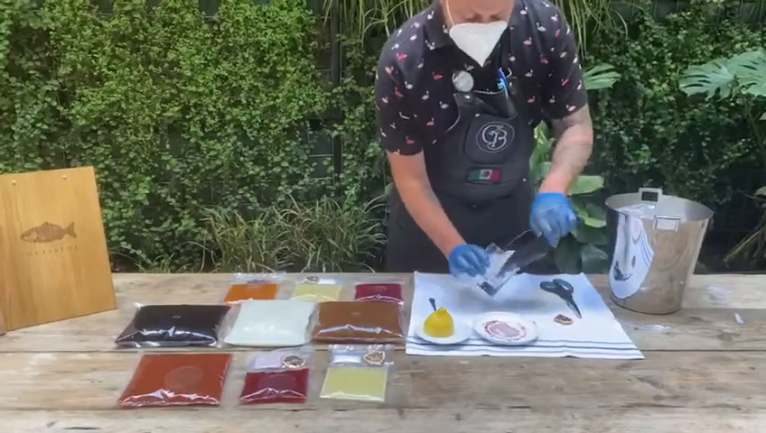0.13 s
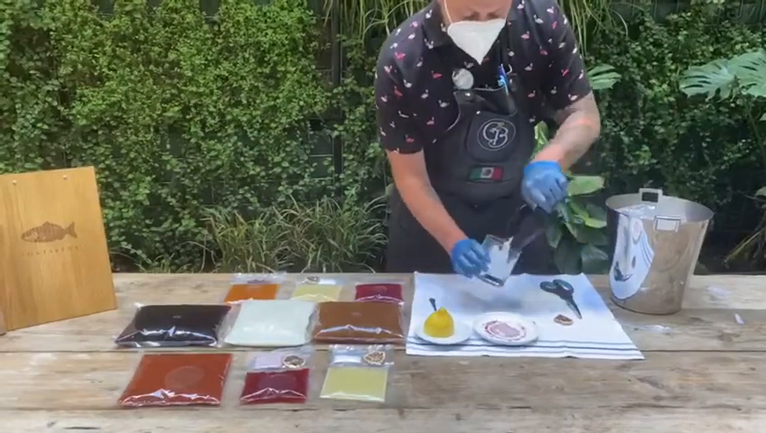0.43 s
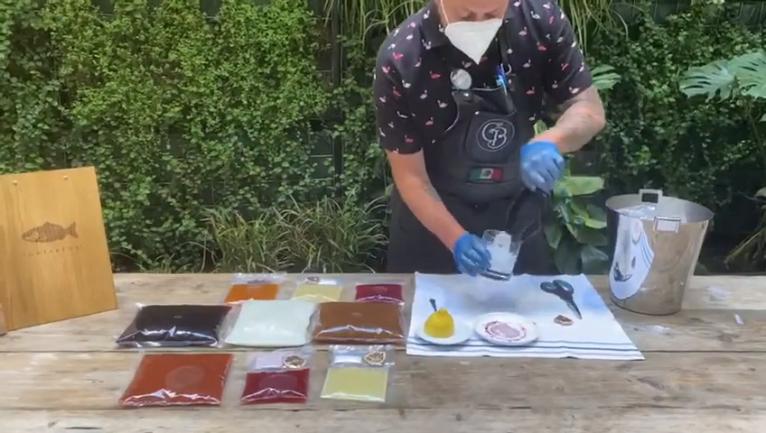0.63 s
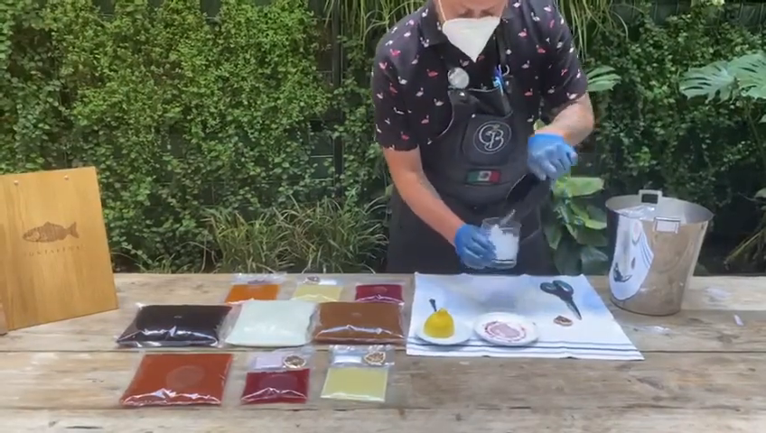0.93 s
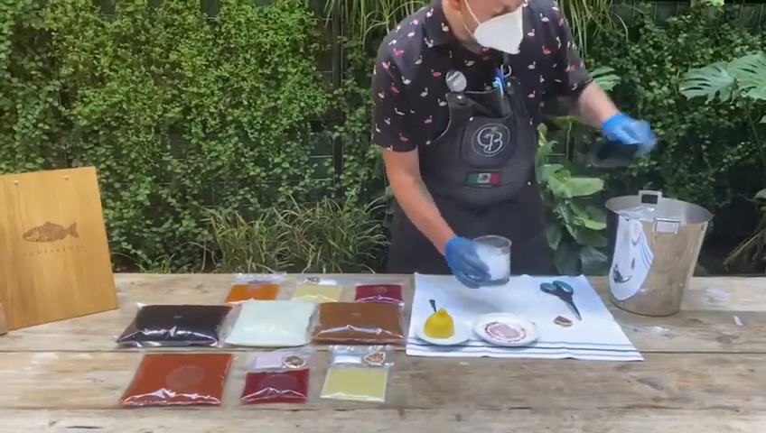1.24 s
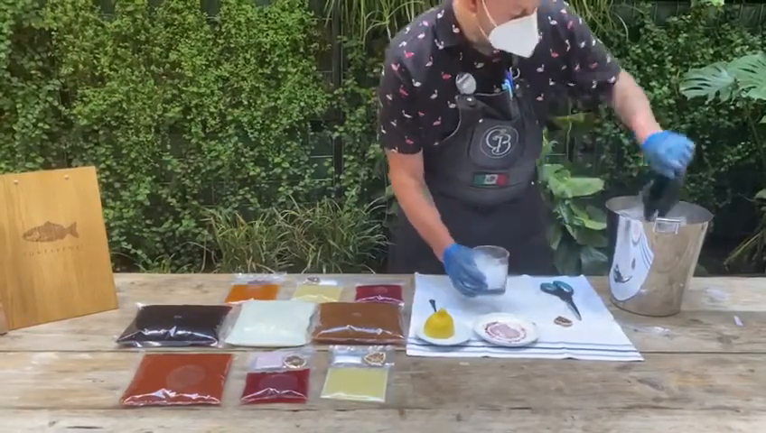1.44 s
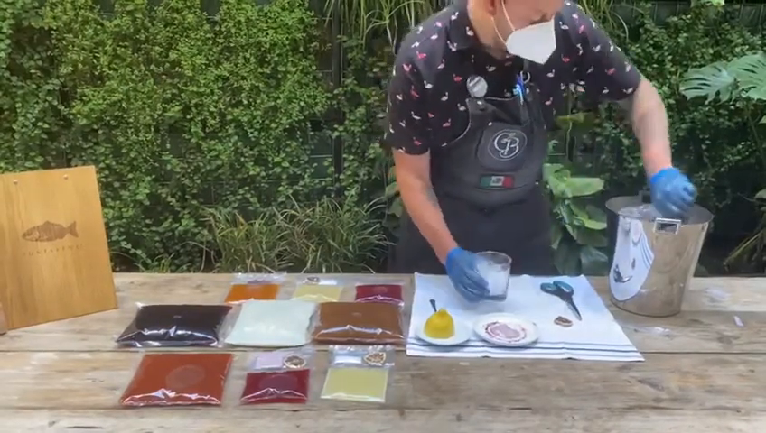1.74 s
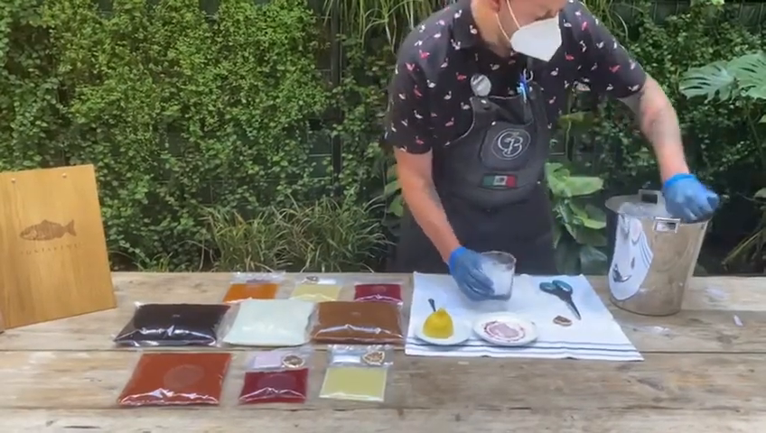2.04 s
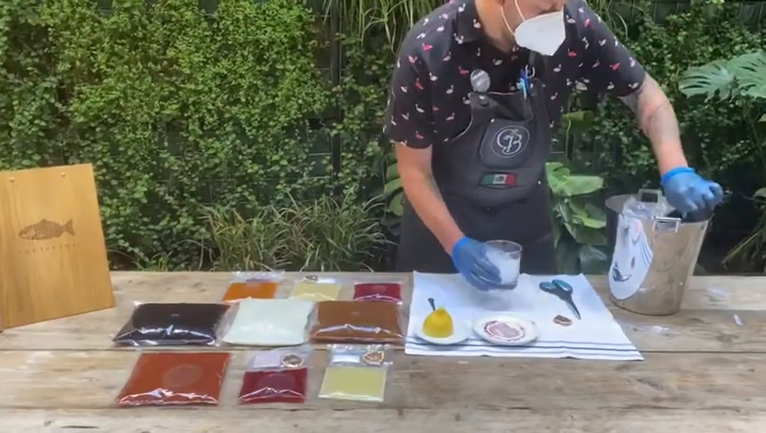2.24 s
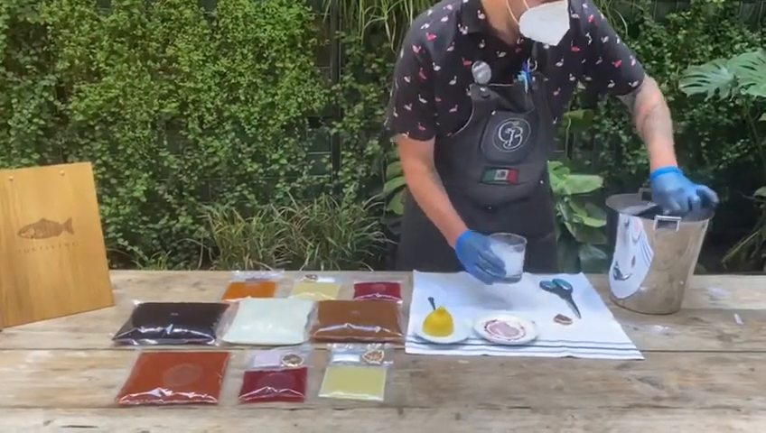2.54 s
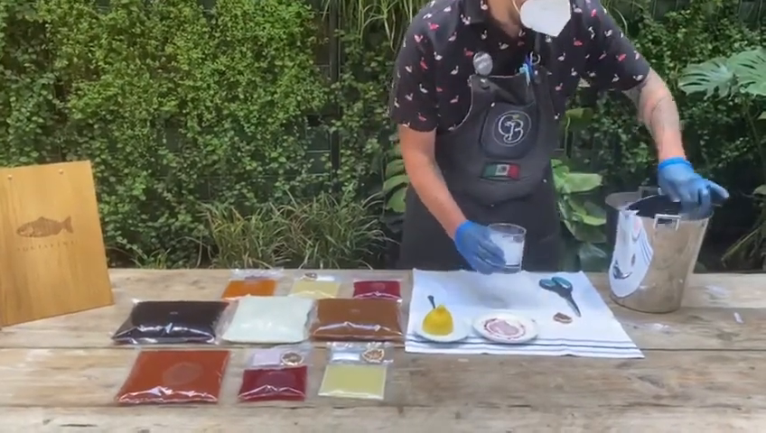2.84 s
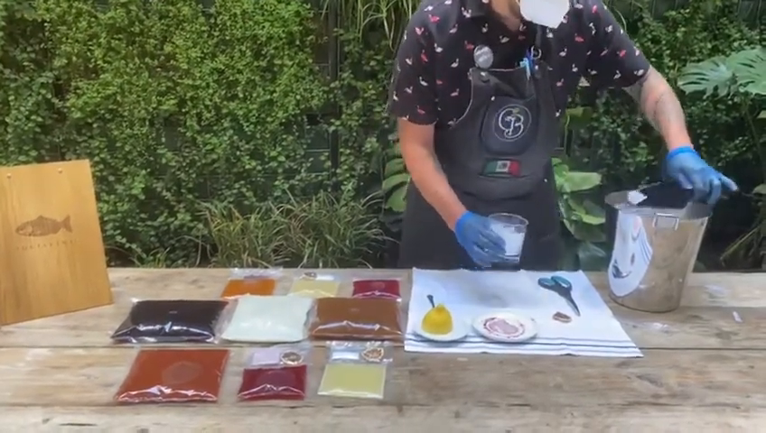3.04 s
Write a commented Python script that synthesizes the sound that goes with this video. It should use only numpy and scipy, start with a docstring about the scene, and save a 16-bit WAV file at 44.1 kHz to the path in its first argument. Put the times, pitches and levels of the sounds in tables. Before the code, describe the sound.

Ice cubes slide from a scoop and knock and clink dully into a hand-held glass; after a brief quiet, the scoop digs into a metal bucket of ice, crunching and clanking. Outdoors, close stereo microphones, faint low rumble.

```python
"""Ice cubes strike a hand-held glass, each a dull knock, a tick and decaying glass modes.
Ice sliding off a scoop rattles around them: dense random impacts exciting short modes and grit.
The scoop then digs into a metal ice bucket: the heap crunches as impacts drive body and wall modes,
and timed blows, one of them hard, ring the wall. Behind lie filtered-noise air and a wavering low rumble.
A close pair of microphones is formed from a common and a differing part."""
import sys
import numpy as np
from scipy import signal
from scipy.fft import rfft, irfft
from scipy.io import wavfile

SR = 44100
rng = np.random.default_rng(int(sys.argv[2]) if len(sys.argv) > 2 else 0)


def generate_wav(sig):
    """Save sig (samples, or channels by samples) to the path in sys.argv[1] as 16-bit PCM at SR."""
    pcm = np.round(np.clip(np.atleast_2d(sig).T, -1, 1) * 32767).astype(np.int16)
    wavfile.write(sys.argv[1], SR, pcm)


N = 141120  # samples

SPOT_DB = 4  # range over which a mode's strength varies with the spot struck
GRAIN_DB = 3.5  # scale of the spread of impact sizes

# Cubes striking the glass, levels before the trims below:
# start_s, knock_level_db, knock_pitch_hz, glass_level_db, tick_level_db
CLINKS = [(0.0488, -52.5, 2170, -59.5, -57), (0.1092, -44, 2340, -54.5, -43.5),
          (0.1959, -57, 2760, -47, -61), (0.226, -42, 2500, -57, -47), (0.244, -40, 2700, -58, -47),
          (0.2686, -37, 2690, -44, -45), (0.2837, -24.5, 2580, -39, -52), (0.329, -40, 1480, -55.5, -61),
          (0.3531, -44, 1506, -55, -66), (0.3684, -47, 2620, -55, -46), (0.379, -34, 2620, -65, -56),
          (0.5841, -36.5, 2560, -69, -38), (0.7196, -44, 1580, -73, -51), (0.7578, -39.5, 1720, -70, -62),
          (0.7797, -50, 2450, -68, -48), (0.809, -44, 1660, -67, -65), (0.856, -54, 2400, -70, -54),
          (0.8948, -26, 2435, -36.5, -50), (0.9224, -31, 2617, -52, -69.5), (0.9436, -39.5, 2620, -58, -73),
          (0.987, -43.5, 2500, -60, -66), (1.187, -51.5, 2510, -56.5, -61)]
# Free modes of the glass: pitch_hz, relative_level_db, t60_s
GLASS_MODES = [(1456, -2.5, 0.13), (2500, -1, 0.2), (2620, -0.5, 0.24), (2760, -2, 0.13), (3290, -8, 0.3),
               (4720, 5.5, 0.13), (6790, -1, 0.13)]
# Bright crack of a cube on bare glass: frequency_hz, level_db
SNAP_SPECTRUM = [(1000, -7), (4000, -10), (7500, -12), (9700, 6.5), (12000, -23)]
# Icy grit, also heard in the slide: frequency_hz, level_db
ICE_GRIT_SPECTRUM = [(500, -11.5), (1000, -1.5), (3500, -7), (7000, -9.5), (12000, -21)]
CLUSTER_SPREAD = 0.0081  # side modes lie up to this share of the pitch away
POUR_ENDS_S, POUR_DAMPING = 0.88, 0.75  # until then pouring ice damps the glass; factor on its decay times
FLUTTER = 0.66  # depth of the throb: loose ice against the glass


def clinks():
    """Modal excitation: each cube gives a dull pitched knock and a tick, and sets the glass ringing."""
    out = np.zeros((2, N))
    for start_s, knock_db, pitch_hz, glass_db, tick_db in CLINKS:
        damping = POUR_DAMPING if start_s < POUR_ENDS_S else 1
        # each glass mode is a close cluster of three
        cluster = []
        for hz, db, t60 in GLASS_MODES:
            for k in (-1, 0, 1):
                side_hz = hz * (1 + CLUSTER_SPREAD * k * rng.random())
                cluster.append((side_hz, db - 4 * abs(k), damping * t60 / (1 + 1.1 * abs(k))))
        tap = gain_of(knock_db) * knock(pitch_hz, t60=0.017, tail_db=-21)
        glass = gain_of(glass_db + 7.5) * peaked(ring(cluster, SPOT_DB, flutter=FLUTTER))
        short_snap = gain_of(glass_db + 2) * peaked(crack(SNAP_SPECTRUM, t60=0.021))
        long_snap = gain_of(glass_db - 1) * peaked(crack(SNAP_SPECTRUM, t60=0.13))
        tick = gain_of(tick_db + 5) * peaked(crack(ICE_GRIT_SPECTRUM, t60=0.032))
        add(out, start_s, tap + glass)
        add(out, start_s, short_snap + long_snap)
        add(out, start_s, tick)
    return out


def knock(hz, t60, tail_db):
    """Heavily damped modes: a tap that swells over two cycles, with an undertone and a weaker, longer tail."""
    tail_t60 = 0.11  # s
    modes = [(hz, 0, t60), (hz * 1.037, -5, t60),
             (hz * 0.442, -16, t60),  # low undertone
             (hz * 1.03, tail_db, tail_t60), (hz * 0.89, tail_db, tail_t60)]
    return peaked(ring(modes, SPOT_DB, rise_s=2 / hz))


# Ice sliding from the scoop, levels before trims: start_s, rattle_level_db, treble_level_db
SLIDE = [(0.0, -64.5, -64), (0.274, -43.5, -44), (0.346, -49.5, -56), (0.39, -50, -53), (0.434, -63, -64),
         (0.576, -56, -59), (0.584, -42, -51), (0.648, -61.5, -61), (0.772, -56.5, -60),
         (0.884, -60.5, -72), (0.894, -57, -49.5), (1.028, -67.5, -76), (1.1, -74, -86)]
# Damped resonances of glass and scoop: pitch_hz, width_hz, relative_level_db
SLIDE_BODY = [(1455, 190, 1.5), (1660, 200, -6), (2176, 170, -2.5), (2296, 280, -2), (2660, 59, -4),
              (3330, 110, -13.5)]


def slide():
    """Random impact excitation: dense contacts in the damped glass and scoop, with grit and loose chips."""
    body = []
    for _ in range(12):
        # each spot is tuned a little apart; a wider resonance decays sooner
        modes = [(hz * (1 + 0.0586 * rng.uniform(-0.965, 1)), db, 5.8 / width)
                 for hz, width, db in SLIDE_BODY]
        body.append(ring(modes, uneven_db=11))
    grit = [crack(ICE_GRIT_SPECTRUM, t60=0.055) for _ in range(6)]
    rattle_drive = contacts(500, 4.6) * level(SLIDE, 1) * gain_of(-2.5)
    grit_drive = contacts(700, GRAIN_DB) * level(SLIDE, 2)
    chip_drive = contacts(140, GRAIN_DB) * level(SLIDE, 2) * gain_of(-8.5)
    return played(rattle_drive, body) + played(grit_drive, grit) + played(chip_drive, chips())


CHIP_HZ, CHIP_T60_S, CHIP_RISE_S = (2760, 7180), 0.038, 0.00064  # pitch range, decay, onset


def chips():
    """Small resonators: pieces of loose ice ring briefly, each at its own pair of pitches."""
    pairs = rng.uniform(*CHIP_HZ, (16, 2))
    return [ring([(hz, 0, CHIP_T60_S) for hz in pair], SPOT_DB, CHIP_RISE_S) for pair in pairs]


# Scoop working in the bucket, levels before trims: start_s, body_level_db, wall_level_db, treble_level_db
DIG = [(1.52, -79, -85, -100), (1.55, -58, -63, -65), (1.614, -59.5, -71, -80), (1.646, -78, -69, -76),
       (1.67, -51.5, -48.5, -64.5), (1.71, -50.5, -45, -55.5), (1.838, -49.5, -45, -60),
       (1.862, -56.5, -49, -63), (1.982, -47, -49, -62), (2.034, -54, -51.5, -70.5),
       (2.116, -40.5, -55, -66), (2.198, -50, -47, -64.5), (2.24, -58.5, -62, -74),
       (2.534, -51, -45.5, -58), (2.552, -33, -27.5, -59), (2.604, -36, -32.5, -63),
       (2.7, -42.5, -38.5, -63.5), (2.74, -49, -46.5, -73.5), (2.878, -54.5, -49.5, -66.5),
       (3.146, -63.5, -64.5, -83.5), (3.2, -74, -62, -74)]
# Low modes of the bucket, also struck by the blows: pitch_hz, relative_level_db, t60_s
BODY_MODES = [(172.2, -6, 0.13), (223, -14.5, 0.13), (280.4, 1, 0.12), (302, 2.5, 0.07), (331, -4.5, 0.16),
              (403, -7.5, 0.12), (483.4, -6.5, 0.14), (535, -1.5, 0.061)]
# Modes of the bucket wall, also struck by the blows: pitch_hz, relative_level_db, t60_s
WALL_MODES = [(892, -11.5, 0.65), (1089, -5, 0.21), (1184, -5, 0.24), (1271, -11, 0.38), (1404, 0, 0.34),
              (1499, -0.5, 0.32), (1564, -8, 0.3), (1721, 1, 0.2), (1840, -4.5, 0.81), (2050, -9.5, 0.12),
              (2380, -9, 0.16), (2510, -4.5, 0.28), (2660, -6.5, 0.09), (3480, -7, 0.11)]
# Scrape of the scoop: frequency_hz, level_db
SCRAPE_SPECTRUM = [(650, -6), (1200, 7), (2500, -4.5), (4000, -13), (12000, -35)]
# Crunch of the heap, also the crack of the blows: frequency_hz, level_db
CRUNCH_SPECTRUM = [(600, -3.5), (2500, 2), (5000, -2), (9000, -3.5), (12000, -6)]


def dig():
    """Granular excitation: shifting ice drives low body, free and ice-damped wall modes, scrape and crunch."""
    low_shapes = []
    for _ in range(8):
        modes = [(hz * rng.uniform(0.94, 1.04), db, t60) for hz, db, t60 in BODY_MODES]
        low_shapes.append(ring(modes, uneven_db=7, rise_s=0.00096))
    free_shapes = [ring(WALL_MODES, 2 * SPOT_DB) for _ in range(4)]
    damped_shapes = []
    for _ in range(6):
        # ice on the wall shifts each mode and cuts its decay to a fifth
        modes = [(hz * (1 + 0.064 * rng.uniform(-0.85, 1)), db, t60 * 0.2) for hz, db, t60 in WALL_MODES]
        damped_shapes.append(ring(modes, uneven_db=37))
    scrapes = [crack(SCRAPE_SPECTRUM, t60=0.056) for _ in range(5)]
    crunches = [crack(CRUNCH_SPECTRUM, t60=0.042) for _ in range(6)]

    body_level, wall_level, treble_level = level(DIG, 1), level(DIG, 2), level(DIG, 3)
    low = played(contacts(600, 1.14) * body_level * gain_of(-0.5), low_shapes)
    free_wall = played(contacts(700, 1.7) * wall_level * gain_of(-5), free_shapes)
    damped_wall = played(contacts(250, 6.2) * wall_level * gain_of(-8.5), damped_shapes)
    scrape = played(contacts(900, GRAIN_DB) * wall_level * gain_of(-4.5), scrapes)
    crunch = played(contacts(1200, GRAIN_DB) * treble_level * gain_of(11.5), crunches)
    return low + free_wall + damped_wall + scrape + crunch


# Blows on the bucket, levels before trims:
# start_s, knock_level_db, knock_pitch_hz, wall_level_db, body_level_db, crack_level_db
BLOWS = [(1.529, -45, 2060, -59, -59, -59), (1.6612, -29, 1630, -38.5, -50, -65),
         (1.6951, -33, 1580, -39, -52, -48), (1.907, -28.5, 1350, -42.5, -40.5, -39),
         (2.0948, -28.5, 1100, -64, -30.5, -68), (2.121, -23.5, 174.6, -62, -42, -67),
         (2.173, -28, 2660, -50, -40, -59), (2.4077, -38, 1487, -40, -44.5, -46.5),
         (2.5492, -20, 1064, -19, -19, -38), (2.587, -23, 1420, -28.5, -31, -41),
         (2.628, -22, 1553, -33, -36, -60), (2.8504, -22, 1463, -35, -45, -49),
         (2.9267, -22.5, 1460, -46.5, -46, -60), (3.178, -43, 1170, -59, -71, -54.5)]


def blows():
    """Impulse response: each single hit gives a knock, the wall's ring, a damped low thump and a crack."""
    out = np.zeros((2, N))
    thump_modes = [(hz, db, t60 * 0.28) for hz, db, t60 in BODY_MODES]
    for start_s, knock_db, pitch_hz, wall_db, body_db, crack_db in BLOWS:
        tap = gain_of(knock_db - 11.5) * knock(pitch_hz, t60=0.022, tail_db=-8.5)
        wall = gain_of(wall_db) * peaked(ring(WALL_MODES, uneven_db=5.5, rise_s=0.0019))
        thump = gain_of(body_db) * peaked(ring(thump_modes, SPOT_DB, rise_s=0.0085))
        burst = gain_of(crack_db + 6.5) * peaked(crack(CRUNCH_SPECTRUM, t60=0.085))
        add(out, start_s, tap + wall)
        add(out, start_s, thump)
        add(out, start_s, burst)
    return out


# Spectrum of the air: frequency_hz, level_db
AIR_SPECTRUM = [(100, 6.5), (200, 5), (600, -1.5), (900, -8), (1700, -14.5), (3000, -22), (5000, -37),
                (8000, -34), (12000, -78.5)]
AIR_DB = -60.5  # RMS level before the pair is formed
# Wavering of the rumble: start_s, level_db
RUMBLE = [(0, -50), (.4, -46.5), (1.1, -52.5), (1.6, -48), (3.2, -49.5)]
# Spectrum of the rumble: frequency_hz, level_db
RUMBLE_SPECTRUM = [(20, -46), (40, -18), (52, -4), (66, 6), (85, -5), (110, -6.5), (150, -17), (220, -61)]


def outdoors():
    """Filtered noise: steady air and a low, wavering rumble."""
    air = gain_of(AIR_DB) * evened(coloured(rng.standard_normal((2, N)), AIR_SPECTRUM))
    rumble = evened(coloured(rng.standard_normal((2, N)), RUMBLE_SPECTRUM)) * level(RUMBLE, 1)
    return air + rumble


FLUTTER_HZ = 100  # centre rate; each mode throbs at 0.5 to 1.5 times this


def ring(modes, uneven_db, rise_s=0.0014, flutter=0):
    """Modal synthesis: one blow as decaying sines, a common and a differing part; common energy 1."""
    t = np.arange(SR // 3) / SR
    hz, db, t60 = np.transpose(modes)[:, :, None]
    draw = rng.random((len(modes), 4))  # two phases, strength, throb rate
    strength_db = db + uneven_db * (draw[:, 2:3] - 0.5)
    size = gain_of(strength_db - 60 * t / t60) * np.minimum(t / rise_s, 1)
    size = size * (1 - t / t[-1]) ** 0.58  # fades to silence at the end
    throb_hz = FLUTTER_HZ * (0.5 + draw[:, 3:])
    size = size * (1 - flutter * np.sin(np.pi * throb_hz * t) ** 2)
    out = np.array([(size * np.sin(2 * np.pi * (hz * t + draw[:, k:k + 1]))).sum(0) for k in (0, 1)])
    return out / np.linalg.norm(out[0])


def crack(points, t60):
    """Noise burst: coloured noise under exponential decay, two independent parts; common energy 1."""
    t = np.arange(4096) / SR
    out = coloured(rng.standard_normal((2, 4096)), points) * gain_of(-60 * t / t60)
    return out / np.linalg.norm(out[0])


def contacts(per_s, spread_db):
    """Poisson-like impact train: random signs, many small impacts and a few large; RMS 1."""
    size_db = spread_db * np.minimum(rng.exponential(1, N), 4)
    size = gain_of(size_db) * rng.choice([-1., 1.], N)
    return evened(size * (rng.random(N) < per_s / SR))


def played(drive, shapes):
    """Convolution: each impact lands on another spot, so takes one of several responses."""
    spot = rng.integers(0, len(shapes), N)
    return sum(signal.oaconvolve((drive * (spot == k))[None], shape, axes=1)[:, :N]
               for k, shape in enumerate(shapes))


def coloured(x, points):
    """Spectral shaping: filters the last axis by a spectrum given in dB."""
    f, db = np.transpose(points)
    hz = np.fft.rfftfreq(x.shape[-1], 1 / SR)
    gain = gain_of(np.interp(np.log(hz + 1), np.log(f), db))
    return irfft(rfft(x) * gain, x.shape[-1])


def level(curve, column):
    """Amplitude envelope: gain over time from one dB column, practically silent outside the curve."""
    rows = np.array(curve)
    return gain_of(np.interp(np.arange(N) / SR, rows[:, 0], rows[:, column], left=-140, right=-140))


def gain_of(db):
    """Decibel law: amplitude ratio from a level in dB."""
    return 10 ** (np.asarray(db) / 20)


def evened(x):
    """RMS normalisation: scales to an RMS of 1 over all samples together."""
    return x / np.sqrt(np.mean(x ** 2) + 1e-20)


def peaked(x):
    """Peak normalisation: scales both parts so that the common one peaks at 1."""
    return x / abs(x[0]).max()


def add(mix, start_s, sound):
    """Superposition: adds a sound into the mix in place, cut at the end."""
    part = mix[:, round(start_s * SR):][:, :sound.shape[1]]
    part += sound[:, :part.shape[1]]


def scene():
    """Sum and difference: all sources add, then form the left and right signals."""
    common, apart = clinks() + slide() + dig() + blows() + outdoors()
    return np.array([common + apart, common - apart])


# Filter on the common part: narrow dips, a hole near 8 kHz, steep top cut: frequency_hz, level_db
MID_SPECTRUM = [(1650, 0), (1790, -8.5), (1950, 1), (2850, 1), (3050, -4), (3250, 1.5), (3900, -0.5),
                (4200, 2), (7400, 1), (7800, -10), (8900, -15), (9400, -1), (11500, 4.5), (11900, -13),
                (12300, -28)]
# Filter on the differing part: weak bass, steep top cut: frequency_hz, level_db
SIDE_SPECTRUM = [(60, -27.5), (140, -11.5), (300, -9.5), (700, -3), (1500, -6), (2400, -6), (3500, 1.5),
                 (5300, -2.5), (7000, -7.5), (7700, 2.5), (9300, 3), (10000, -13), (11800, -28)]
EDGE_HZ = 12600  # upper band limit


def record(dry):
    """Mid-side filtering: the common part dips around 8 kHz, the difference is weak in bass and top."""
    mid = coloured((dry[0] + dry[1]) / 2, MID_SPECTRUM)
    side = coloured((dry[0] - dry[1]) / 2, SIDE_SPECTRUM)
    pair = np.array([mid + side, mid - side])
    lowpass = signal.firwin(511, EDGE_HZ, window=("kaiser", 9), fs=SR)
    return signal.oaconvolve(pair, lowpass[None], "same")


dry = scene()
out = record(dry)
generate_wav(out)
```